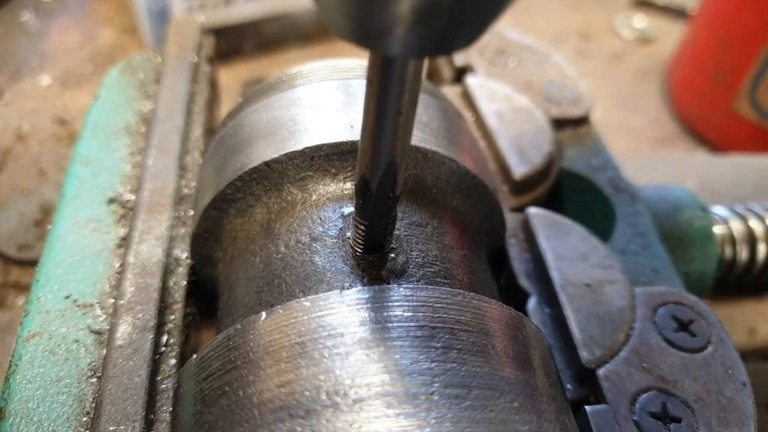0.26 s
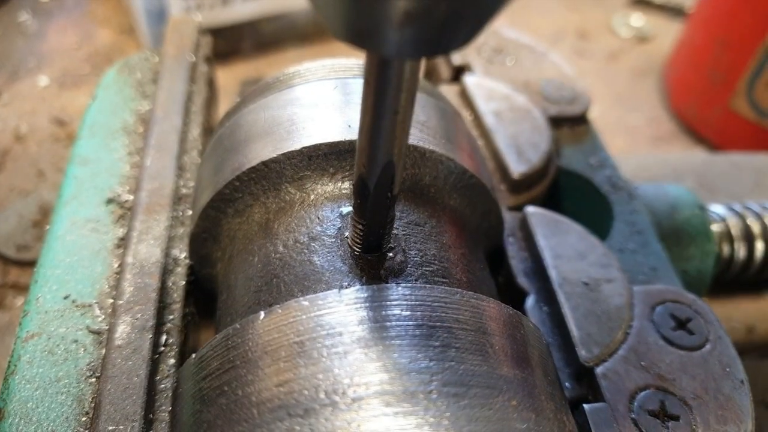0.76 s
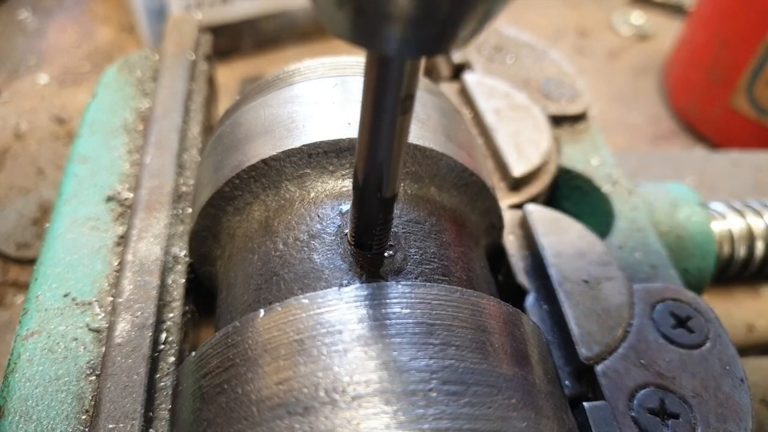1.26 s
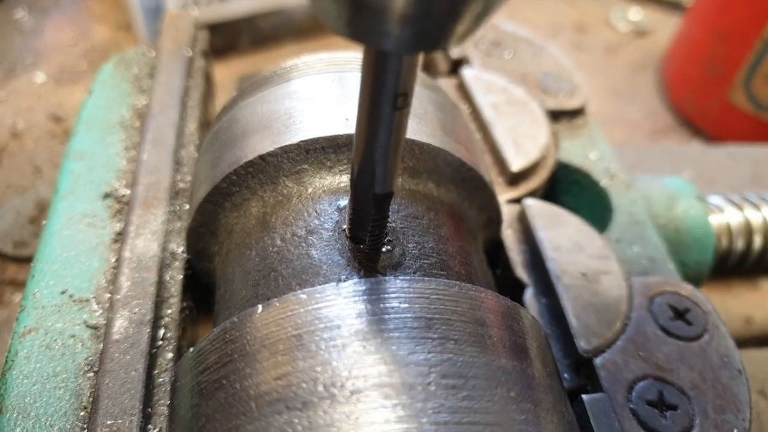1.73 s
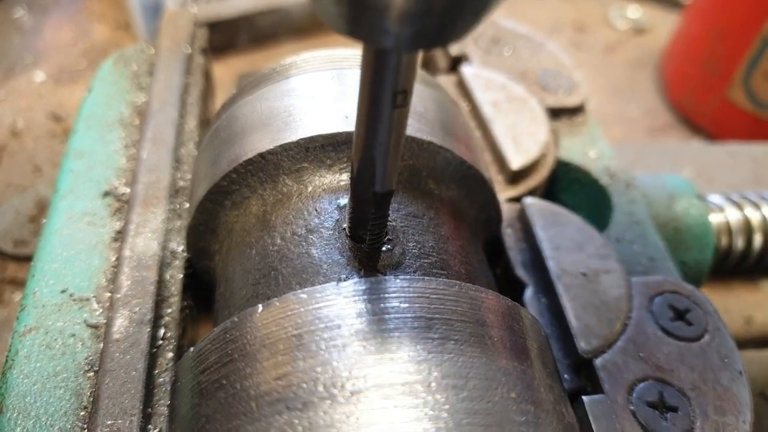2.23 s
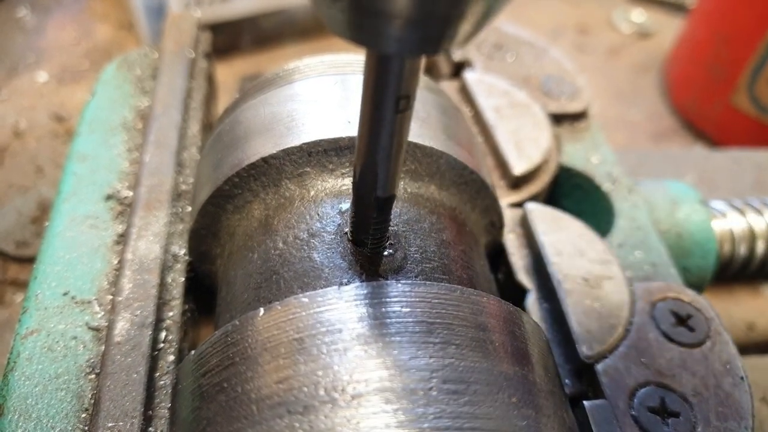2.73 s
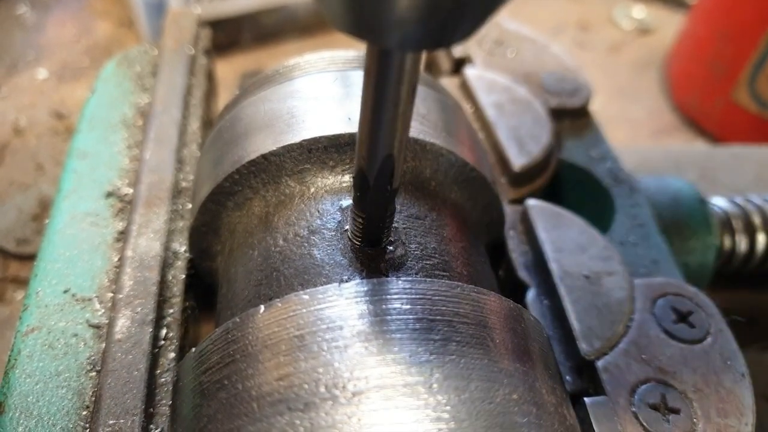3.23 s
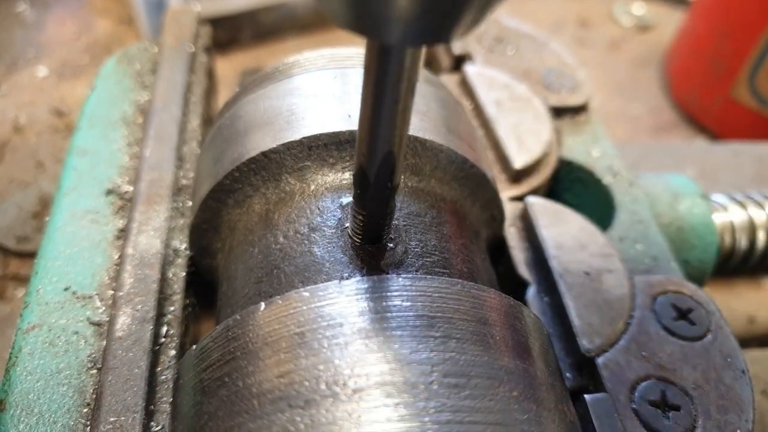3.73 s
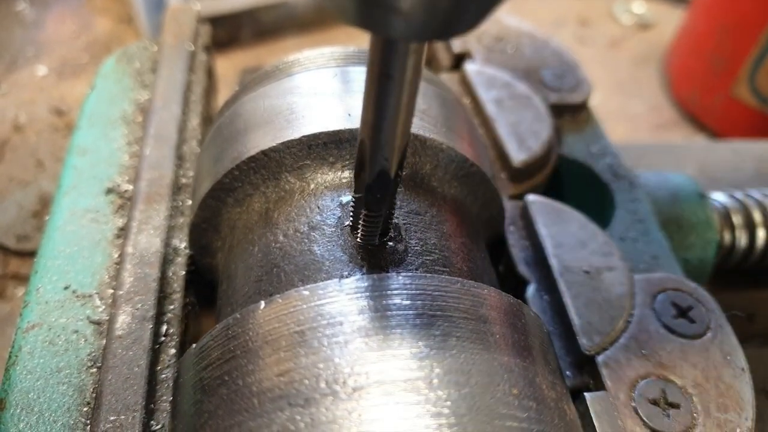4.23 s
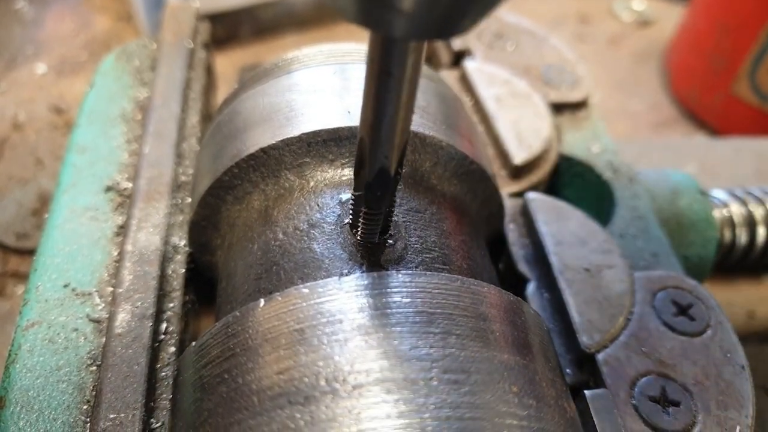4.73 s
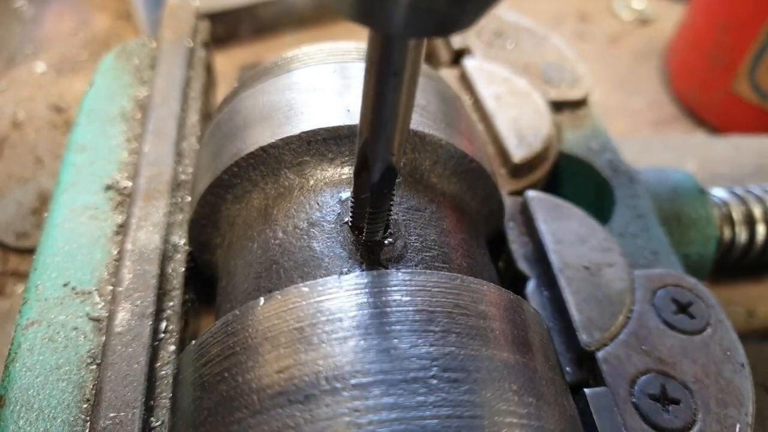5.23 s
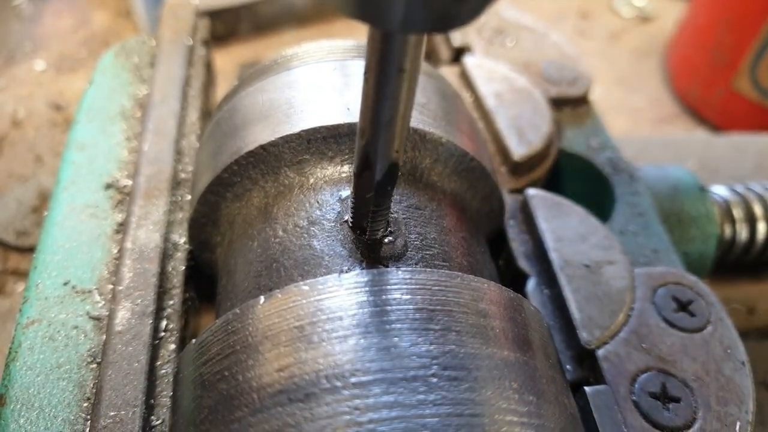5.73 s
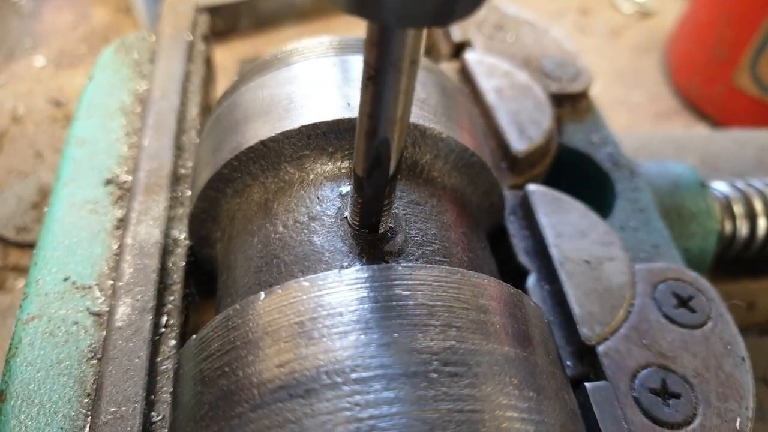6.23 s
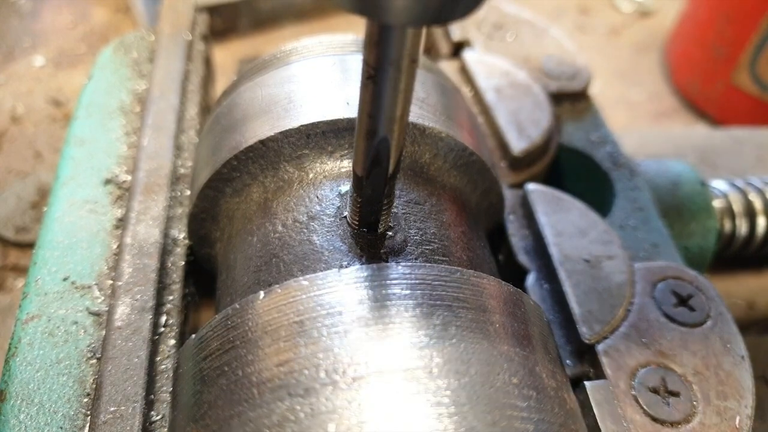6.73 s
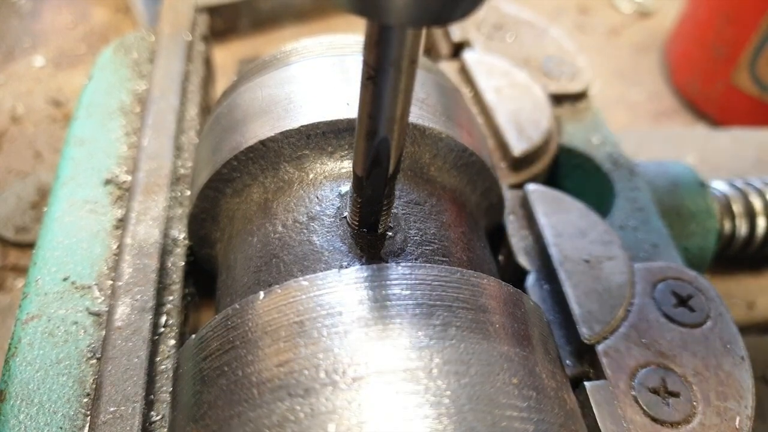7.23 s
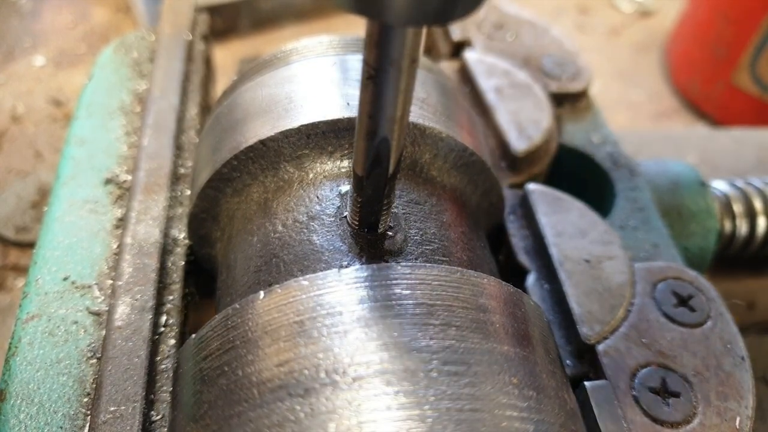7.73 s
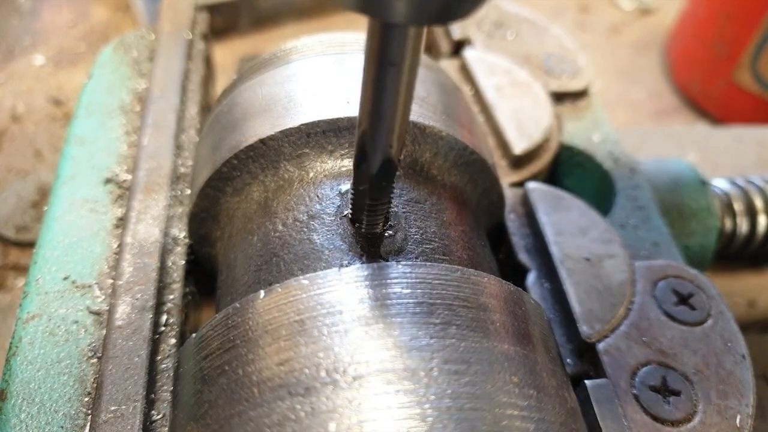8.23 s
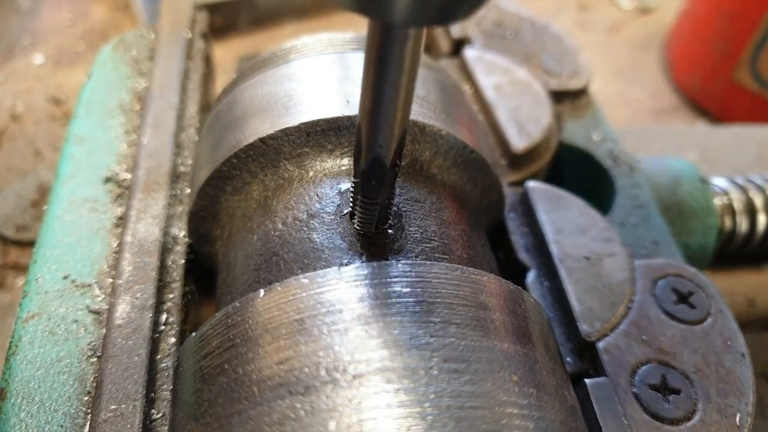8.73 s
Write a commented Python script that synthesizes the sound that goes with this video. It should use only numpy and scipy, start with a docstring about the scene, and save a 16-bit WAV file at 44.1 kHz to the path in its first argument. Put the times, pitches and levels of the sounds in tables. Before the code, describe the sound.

A close, dry stereo take in a small workshop: soft wavering hiss on the left, low room murmur, and handling rumble with muffled bumps mostly on the right. At 0.1 s a ratchet wrench swings back with six crisp clicks in 0.2 s, then a lone click near 0.4. Gritty scrapes of the tap follow from 0.5 to 2 s, with a faint bright rub at 1.3 and a dull knock at 1.75. Further click runs come at 2.3, 3.4, 4.4, 6.3, 7.4 and 8.4 s, the last two longest, with stray single clicks between. Light steel rubs surface around 3.2-3.9, dull knocks at 4.3, 7.5 and 7.9, and a thin, faint squeal at 5.3 amid weak scraping. A heavy low bump lands at 7.0; a stronger scrape accompanies the last run at 8.5. Each click leaves a slight steel ring and short wall tail until about 9 s.

```python
"""A thread tap is worked into a metal part in a vice with a ratchet wrench, in a small workshop.
From the start a soft filtered-noise hiss lies left over a low room murmur; handling rumble and bumps shake the right.
At 0.1 s the first of seven back swings: the pawl clicks over a run of teeth, each a snap of filtered impulse
and noise, then a short seating ring. From 0.5 s come noise scrapes with chips, from 1.3 s bright rubs,
from 1.8 s dull knocks of slack, at 5.3 s one thin squeal. The walls return a short faint tail."""
import sys
import numpy as np
from scipy import signal
from scipy.fft import rfft, irfft, next_fast_len
from scipy.io import wavfile

SR = 44100
rng = np.random.default_rng(int(sys.argv[2]) if len(sys.argv) > 2 else 0)


def to_wav(s):
    """Save 16-bit WAV."""
    ch = np.atleast_2d(s).T  # columns
    pcm = np.round(np.clip(ch, -1, 1) * 32767)  # PCM
    wavfile.write(sys.argv[1], SR, pcm.astype(np.int16))


N = 395350
TIME = np.arange(N) / SR
CLICK_TIME = np.arange(4096) / SR

# Unrest of the hand. Each row: time in seconds, rumble in dB.
HAND_UNREST = [(0, -48.5), (.33, -27.5), (.5, -48), (.8, -61), (1.32, -44), (1.5, -51), (2.3, -38.5),
               (2.62, -37.5), (2.8, -52), (3.25, -52), (3.58, -39), (3.9, -52), (4.55, -40.5), (4.9, -68),
               (6.2, -46.5), (7.02, -36), (7.66, -46), (8.96, -42.5)]
# Back swings of the wrench. Each row: start in seconds, end in seconds, first gap and last gap as multiples
# of the middle gap, snap in relative dB, snap pitch in Hz, bright tick in dB, seating ring in relative dB,
# growth over the swing in dB, shake of the housing in dB.
SWINGS = [(0.1015, 0.312, 1.3, 0.96, -38, 5990, -39, -56, 0, -59),
          (2.2595, 2.427, 1.08, 1.15, -37.5, 4900, -35, -33.5, -1, -33),
          (3.3673, 3.5492, 1.22, 1, -37.5, 6170, -32.5, -39, 3, -36),
          (4.3992, 4.494, 1.22, 1.7, -37, 5830, -41, -40.5, -1, -26.5),
          (6.3305, 6.4541, 0.8, 1.24, -33.5, 6170, -38, -39.5, 3, -27.5),
          (7.4124, 7.557, 1.23, 1.67, -35.5, 6050, -36.5, -40.5, 1.5, -30.5),
          (8.4349, 8.6434, 1.15, 1.83, -35.5, 5960, -39.5, -52, 0.5, -31)]


def from_db(db):
    """Decibels to gain."""
    return 10 ** (np.asarray(db) / 20)


def rms_one(x):
    """Scale to rms 1."""
    return x / np.sqrt(np.mean(x ** 2) + 1e-20)


def in_time(rows):
    """Interpolate the columns of a curve at every sample."""
    s, *columns = np.transpose(rows)
    return [np.interp(TIME, s, column) for column in columns]


def add(track, sound, s):
    """Mix a sound into a track from a given time on."""
    i = int(np.clip(round(s * SR), 0, N - 1))
    track[..., i:i + sound.shape[-1]] += sound[..., :N - i]


def coloured(x, spectrum):
    """Filter by (Hz, dB) points, straight on a log-frequency axis, falling off beyond both ends."""
    size = next_fast_len(x.shape[-1])
    hz, db = np.transpose(spectrum)
    bins_hz = np.maximum(np.fft.rfftfreq(size, 1 / SR), 1)
    gain = from_db(np.interp(np.log(bins_hz), np.log(hz), db))
    ends = np.minimum(1, bins_hz / hz[0]) ** 2 * np.minimum(1, hz[-1] / bins_hz) ** 4
    return irfft(rfft(x, size) * gain * ends, size)[..., :x.shape[-1]]


def noise(spectrum):
    """Coloured noise of rms 1."""
    return rms_one(coloured(rng.standard_normal(N), spectrum))


def drift(per_s):
    """Random wander of rms 1, straight between knots at a given rate."""
    knots = rng.standard_normal(4000)
    return rms_one(np.interp(TIME * per_s, np.arange(len(knots)), knots))


def resonate(x, hz, width_hz):
    """A two-pole resonance with gain 1 on top."""
    r = np.exp(-np.pi * width_hz / SR)
    zeros = np.array([1, 0, -1]) * (1 - r * r) / 2
    poles = [1, -2 * r * np.cos(2 * np.pi * hz / SR), r * r]
    return signal.lfilter(zeros, poles, x)


def swell(t, hz, rise_s, decay_s):
    """A softly driven mode: its envelope swells to 1 at t = 0 and dies away."""
    envelope = np.where(t < 0, np.exp(-(t / rise_s) ** 2), np.exp(1 - np.hypot(1, t / decay_s)))
    return envelope * np.sin(2 * np.pi * (hz * t + rng.random()))


def background(hiss_db=2.5, edge_db=4.0, room_left_db=-54.5, room_right_db=-50.0):
    """A soft wavering noise hiss on the left over the low murmur of the room."""
    # Each row: time in seconds, hiss level in relative dB, level of its upper edge in relative dB.
    hiss_levels = [(0, -63.5, -64), (1.56, -63.5, -64.5), (1.64, -62.5, -108), (2.5, -64.5, -62.5),
                   (2.7, -63.5, -106), (3.3, -60, -73), (4.3, -63, -79), (4.7, -69.5, -96),
                   (6.9, -69.5, -87.5), (8.96, -64.5, -85)]
    # Spectra. Each row: frequency in Hz, density in relative dB per Hz.
    hiss_colour = [(500, 5), (900, -14.5), (1400, -6.5), (2000, 0.5), (2700, -13), (3500, 2), (4100, 4),
                   (4900, -3.5), (5600, -14.5), (6500, -29.5)]
    edge_colour = [(800, -4.5), (1400, 4.5), (2700, 4.5), (4000, -4), (5400, 7), (6200, 0.5), (6800, -10),
                   (7500, -32.5)]
    room_left_colour = [(25, 11), (60, -0.5), (120, 6), (185, -5), (300, -4.5), (500, -21), (900, -50.5),
                        (2000, -54.5), (5000, -73.5), (8000, -60), (12000, -35), (14300, -38),
                        (16000, -66.5)]
    room_right_colour = [(25, -3.5), (70, 8), (130, -11), (200, -15), (350, -27.5), (600, -42),
                         (1200, -39.5), (4000, -50.5), (8000, -52.5), (12000, -44), (14300, -47.5),
                         (16000, -71)]
    level, edge = in_time(hiss_levels)
    hiss = from_db(level + hiss_db + drift(per_s=25)) * noise(hiss_colour)
    hiss += from_db(edge + edge_db) * noise(edge_colour)
    room_left = from_db(room_left_db) * noise(room_left_colour)
    room_right = from_db(room_right_db) * noise(room_right_colour)
    return hiss * from_db([[0], [-29]]) + np.array([room_left, room_right])


def hum(right_db=-16.0):
    """The room's murmur gathers in a few narrow low resonances, driven by noise."""
    # Each row: frequency in Hz, width in Hz, level in dB.
    room_modes = [(174.8, 12.6, -56), (214, 14, -60), (295.2, 8.4, -63.5), (369, 17, -73)]
    tones = sum(from_db(db) * rms_one(resonate(rng.standard_normal(N), hz, width_hz))
                for hz, width_hz, db in room_modes)
    return coloured(tones, [(100, 0), (450, 0)]) * from_db([[0], [right_db]])


def effort():
    """Level of the hand's rumble in dB: its unrest, plus in power a shake through each swing."""
    lead_s, release_s = 0.083, 0.07   # before the first tooth, after the last
    power = from_db(in_time(HAND_UNREST)[0]) ** 2
    for start, end, *_, shake_db in SWINGS:
        swinging = np.interp(TIME, [start - lead_s, start, end, end + release_s], [0, 1, 1, 0])
        power = power + (from_db(shake_db) * swinging) ** 2
    return 10 * np.log10(power)


def chance_nudges(per_s=3.0, above_unrest_db=6, hz_range=(64, 125)):
    """Lesser bumps at random times, as (s, peak dB, Hz), their level following the hand's unrest."""
    at = np.flatnonzero(rng.random(N) < per_s / SR)
    pitches_hz = rng.uniform(*hz_range, size=100)
    return [(TIME[i], np.interp(TIME[i], *np.transpose(HAND_UNREST)) + above_unrest_db, hz)
            for i, hz in zip(at, pitches_hz)]


def handling(left_db=-25.5, frame_db=-23.5, leak_db=-27.0, housing_hz=130):
    """The hand's effort shakes the housing: a low rumble and soft bumps, nearly all on the right."""
    # Stronger bumps on the microphone housing. Each row: time in seconds, peak in dB, pitch in Hz.
    bumps = [(0.352, -21.5, 99), (1.631, -28, 67.6), (1.759, -14.5, 118), (1.868, -21.5, 105),
             (1.961, -21, 120), (2.088, -22.5, 99.4), (2.384, -15, 117), (2.453, -18, 121),
             (3.484, -21.5, 127), (3.686, -20, 100), (3.775, -27.5, 109), (4.266, -21.5, 70),
             (4.639, -14, 104), (4.851, -32.5, 85), (6.026, -24, 66.4), (6.803, -23, 117),
             (7.043, -11, 128.7), (7.179, -21, 116), (7.906, -20, 124), (8.149, -22, 111),
             (8.728, -21, 132)]
    # Each row: frequency in Hz, density in relative dB per Hz.
    rumble_colour = [(25, -33), (50, -3.5), (90, -1.5), (130, -4.5), (160, -12.5), (195, -9), (260, -28.5),
                     (400, -31), (700, -43.5), (1400, -71)]
    surge_db, surges_per_s = 2.0, 14
    level = effort() + surge_db * drift(surges_per_s)
    rumble = noise(rumble_colour)
    rumble = rms_one(rumble + 1.83 * resonate(rumble, housing_hz, width_hz=33))
    shake = from_db(level) * rumble
    frame = from_db(level + frame_db) * noise(rumble_colour)
    t = np.arange(-SR // 50, SR // 8) / SR
    for s, db, hz in bumps + chance_nudges():
        add(shake, from_db(db) * swell(t, hz, rise_s=0.0031, decay_s=0.011), s + t[0])
    rocking = from_db(left_db) * coloured(shake, [(30, -44), (120, -25.5), (250, -3), (1500, 10.0)])
    left = frame - rocking - from_db(leak_db) * shake
    return np.array([left, shake])


def teeth():
    """Every tooth, as (s, snap dB, snap Hz, tick dB, seat dB); gaps follow one smooth arc per swing."""
    # Number of teeth in each swing.
    teeth_per_swing = [6, 4, 8, 6, 6, 10, 11]
    # Single teeth, as the wrench creeps or comes to rest. Each row: time in seconds, snap in relative dB,
    # snap pitch in Hz, bright tick in dB, seating ring in relative dB.
    lone_teeth = [(0.3866, -37, 5300, -46, -69), (2.0672, -37.5, 5880, -37, -31.5),
                  (2.4666, -34, 4800, -32, -32), (6.5141, -34.5, 6050, -40.5, -40.5),
                  (7.0363, -34, 5300, -41, -41)]
    first_snap_db, first_tick_db = -2.5, -6   # the first tooth is only half lifted
    snap_spread_db, snap_spread_hz, tick_spread_db, seat_spread_db = 1.0, 110, 2.6, 1.5
    rows = []
    for count, swing in zip(teeth_per_swing, SWINGS):
        start, end, first_gap, last_gap, snap, hz, tick, seat, growth, _ = swing
        arc = np.polyfit([0, .5, 1], [first_gap, 1, last_gap], 2)
        gaps = np.polyval(arc, np.linspace(0, 1, count - 1))
        grown = growth * np.linspace(-.5, .5, count)
        first = np.arange(count) == 0
        chance = rng.standard_normal((count, 4)).T
        rows += zip(start + (end - start) * np.r_[0, np.cumsum(gaps)] / gaps.sum(),
                    snap + grown + first_snap_db * first + snap_spread_db * chance[0],
                    hz + snap_spread_hz * chance[1],
                    tick + grown + first_tick_db * first + tick_spread_db * chance[2],
                    seat + grown + first_snap_db * first + seat_spread_db * chance[3])
    return rows + lone_teeth


def body_response(modes):
    """Causal (minimum-phase) spectrum of a set of modes, for the left and right side."""
    size = len(CLICK_TIME)
    hz = np.fft.rfftfreq(size, 1 / SR)
    power = from_db(-69.5)   # weak broadband floor between the modes
    for centre_hz, width_hz, left_db, right_db in modes:
        peak = from_db([[left_db], [right_db]]) ** 2
        power = power + peak / (1 + ((hz - centre_hz) / (0.57 * width_hz)) ** 2) ** 2
    cepstrum = irfft(np.log(power) / 2)   # folded forward in time: nothing sounds before the blow
    cepstrum[:, 1:size // 2] *= 2
    cepstrum[:, size // 2 + 1:] = 0
    return np.exp(rfft(cepstrum))


def strike(modes, contact_s, chatter_db, echo_db, echo_s, lag_s=.00038):
    """A sharp contact, its chatter and quick echoes off bench and machine, all coloured by the modes."""
    t = CLICK_TIME
    shared, own, echoes = rng.standard_normal((3, 2, len(t)))
    chatter = (shared[0] + 0.27 * own) * np.exp(-t / contact_s)
    echoes = echoes * np.clip((t - .003) / .004, 0, 1) * np.exp(-t / echo_s)
    spread = from_db(chatter_db) * rms_one(chatter) + from_db(echo_db) * rms_one(echoes)
    force = (t == 0) + spread / np.sqrt(len(t))
    hz = np.fft.rfftfreq(len(t), 1 / SR)
    delay = np.exp(-2j * np.pi * hz * np.array([[lag_s], [0]]))   # the left port hears it later
    return irfft(rfft(force) * body_response(modes) * delay)


def at_level(sound, db):
    """Set the rms of the louder side over the first 5 ms."""
    return sound * from_db(db) / np.sqrt(np.mean(sound[:, :220] ** 2, axis=1).max())


def after_ring(db):
    """The steel of the wrench rings on faintly after a snap, as decaying sines."""
    # Each row: frequency in Hz, left in dB and right in dB against the given level, t60 in seconds.
    steel_modes = [(2352, -33, -43, .3), (2938, -32, -32, .35), (4537, -27, -36, .25),
                   (4790, -36, -32, .25), (9059, -42, -30, .22)]
    t = np.arange(SR // 3) / SR
    ring = 0
    for hz, left_db, right_db, t60_s in steel_modes:
        tone = from_db(-60 * t / t60_s) * np.sin(2 * np.pi * (hz * t + rng.random()))
        ring = ring + from_db(db + np.array([[left_db], [right_db]])) * tone
    return ring


def ratchet(snap_db=3.0, seat_db=5.0, seat_hz=2070, vice_db=-1.5, thud_db=6.0,
            main_width_hz=620, main_db=6.0):
    """The pawl snaps off each tooth, seats in the next, and jolts the part in the vice."""
    # Modes of the wrench. Each row: frequency in Hz, nominal width in Hz, left and right in relative dB.
    snap_modes = [(556, 337, -13, -11), (2104, 510, -2, -12.5), (3130, 70, -18, -24.5),
                  (3910, 380, 0, -16.5), (4370, 1340, -1, -18), (5100, 400, -4.5, -17.5),
                  (6230, 420, -6, -20), (11150, 2700, -11, -37.5), (14240, 1100, -6, -42)]
    # Modes of the small pawl and its spring. Each row: frequency in Hz, nominal width in Hz,
    # left and right in relative dB.
    tick_modes = [(8870, 660, -37, 2), (9870, 2000, -10.5, 5), (12180, 1070, 2.5, 9),
                  (12960, 630, 3.5, 2.5), (15240, 1100, -7.5, -20.5)]
    jolt_hz, jolt_spread_hz = 486, 23
    out = np.zeros((2, N))
    for s, snap, snap_hz, tick, seat in teeth():
        modes = snap_modes + [(snap_hz, main_width_hz, main_db, main_db - 20)]
        snap_sound = strike(modes, contact_s=.0014, chatter_db=3.5, echo_db=-7.5, echo_s=0.005)
        tick_sound = strike(tick_modes, contact_s=0.002, chatter_db=11.0, echo_db=-6.5, echo_s=0.014)
        click = at_level(snap_sound, snap + snap_db) + at_level(tick_sound, tick)

        seat_time = CLICK_TIME - .0032 - 0.000464 * rng.normal()
        seating = swell(seat_time, seat_hz + 65 * rng.normal(), rise_s=0.00066, decay_s=0.0023)
        click += seating * from_db(seat + seat_db + np.array([[0], [-19]]))

        force_db = (snap + seat) / 2
        pitch_hz = jolt_hz + jolt_spread_hz * rng.normal()
        jolt = swell(CLICK_TIME - .003, pitch_hz, rise_s=0.00089, decay_s=0.0057)
        # the housing rocks: the sides move oppositely
        click += jolt * from_db(force_db + vice_db + np.array([[0], [3]])) * [[1], [-1]]
        thud = swell(CLICK_TIME - .005, 160 + 30 * rng.normal(), rise_s=0.0015, decay_s=0.0091)
        click[1] += thud * from_db(force_db + thud_db)
        add(out, click, s)
        add(out, after_ring(snap), s)
    return out


def chips(per_s=350, level_db=-5, spread_db=4):
    """The fine grit of chips breaking off: random impulses, many small and a few large."""
    # Each row: frequency in Hz, density in relative dB per Hz.
    chip_colour = [(700, -10), (1300, 0), (2100, 5.5), (3400, 5.5), (5200, -3.5), (6800, -21)]
    sizes = from_db(spread_db * np.minimum(rng.exponential(1, N), 4)) * rng.choice([-1, 1], N)
    breaks = sizes * (rng.random(N) < per_s / SR)
    return from_db(level_db) * rms_one(coloured(breaks, chip_colour))


def scraping(rough_db=1.0):
    """Uneven scrapes: the tap's edges through the metal, and at 8.45 s the pawl sliding over the teeth;
    roughened noise strokes with chips."""
    # Each row: start in seconds, end in seconds, level in relative dB, share of the stroke spent rising.
    scrapes = [(0.465, 0.63, -58.5, 0.031), (1.022, 1.232, -60.5, 0.54), (1.207, 1.504, -63.5, 0.083),
               (1.606, 1.952, -65.5, 0.54), (2.207, 2.315, -60, 0.56), (3.13, 3.224, -68, 0.37),
               (3.69, 3.97, -64, 0.8), (5.218, 5.49, -70, 0.42), (5.48, 5.97, -70, 0.75),
               (7.757, 7.908, -70.5, 0.19), (8.124, 8.37, -77, 0.42), (8.445, 8.597, -53.5, 0.25)]
    # Each row: frequency in Hz, density in relative dB per Hz.
    scrape_colour = [(700, -9), (1400, -15), (2000, 2), (2700, -12.5), (3500, 4), (4300, 2.5), (5300, -4.5),
                     (6200, -24), (8000, -54), (13500, -29)]
    level = np.zeros(N)
    for start, end, db, rising in scrapes:
        peak = start + (end - start) * rising
        level += from_db(db) * np.interp(TIME, [start, peak, end], [0, 1, 0]) ** .5
    roughness = from_db(rough_db * drift(per_s=350) + 0.45 * drift(per_s=35))
    return level * rms_one(noise(scrape_colour) * roughness) + level * chips()


def rubs():
    """Light bright rubs of steel on steel: high noise, independent on each side."""
    # Each row: middle in seconds, length in seconds, level in relative dB.
    rub_rows = [(1.277, 0.23, -85), (3.187, 0.1, -78), (3.318, 0.08, -73.5), (3.93, 0.071, -74)]
    level = sum(from_db(db) * np.exp(-(2 * (TIME - s) / length_s) ** 2) for s, length_s, db in rub_rows)
    return np.array([level * noise([(7500, 1.5), (9500, 11), (13500, 8.0)]) for side in range(2)])


def squeal():
    """A thin squeal as the tap binds: noise through narrow resonances."""
    # Start and end in seconds.
    start, end = (5.26, 5.42)
    # Partials. Each row: frequency in Hz, level in relative dB.
    partials = [(3100, -72), (5020, -69), (13400, -86)]
    binding = np.interp(TIME, [start, (start + end) / 2, end], [0, 1, 0]) ** .5
    out = np.zeros(N)
    for hz, db in partials:
        tone = resonate(resonate(rng.standard_normal(N), hz, width_hz=110), hz, width_hz=220)
        out += binding * from_db(db) * rms_one(tone)
    return out


def cutting():
    """The tap in its hole and the sliding pawl: scrapes and squeal mostly on the left, rubs on both sides."""
    return (scraping() + squeal()) * from_db([[0], [-24]]) + rubs()


def knocks():
    """Slack in the wrench closes with dull knocks and short groans, and a trace of metal."""
    # Each row: time in seconds, peak in dB, pitch in Hz, decay in seconds, wrench's ring in dB.
    knock_rows = [(1.753, -37, 323, 0.0015, -68), (4.260, -33, 245, 0.001, -61),
                  (4.34, -40.5, 520, 0.0047, -46.5), (7.474, -43.5, 482, 0.017, -68),
                  (7.900, -44, 470, 0.0039, -66)]
    out, t = np.zeros(N), np.arange(-SR // 20, SR // 5) / SR
    for s, db, hz, decay_s, ring_db in knock_rows:
        dull = from_db(db) * swell(t, hz, decay_s / 2, decay_s)
        metal = from_db(ring_db) * swell(t, 2090, rise_s=0.0036, decay_s=0.0014)
        add(out, dull + metal, s + t[0])
    return out * from_db([[0], [-5]])


def workshop(dry, wet_db=-10.0, t60_s=0.26):
    """A short faint tail from the walls: convolution with decaying coloured noise."""
    # Each row: frequency in Hz, wall return in relative dB.
    echo_colour = [(200, -25.5), (900, 4), (1500, 7.5), (2080, -8), (2900, 4.5), (4000, -4), (6000, -11),
                   (8000, -11), (10000, -12.5), (14000, -7)]
    t = np.arange(SR // 2) / SR
    onset = np.clip((t - .006) / .01, 0, 1)
    tails = rng.standard_normal((2, len(t))) * onset * from_db(-60 * t / t60_s)
    response = from_db(wet_db) * coloured(rms_one(tails), echo_colour) / np.sqrt(len(t))
    return signal.fftconvolve(dry, response, axes=1)[:, :N]


def scene(cutting_db=9.0):
    """Wrench and tap in their room, with handling and background."""
    tools = ratchet() + from_db(cutting_db) * cutting() + knocks()
    return background() + hum() + handling() + tools + workshop(tools)


def record(dry, notch_hz=7900, notch_width_hz=1300, notch_depth=0.52, top_hz=14600, cutoff_hz=16400):
    """The microphone ports swallow part of a band near 8 kHz and two low-passes cut the top."""
    sound = dry - notch_depth * resonate(dry, notch_hz, notch_width_hz)
    dull = signal.sosfilt(signal.butter(14, top_hz, fs=SR, output="sos"), sound)
    return signal.sosfilt(signal.ellip(10, .1, 80, cutoff_hz, fs=SR, output="sos"), dull)


dry = scene()
out = record(dry)
to_wav(out)
```